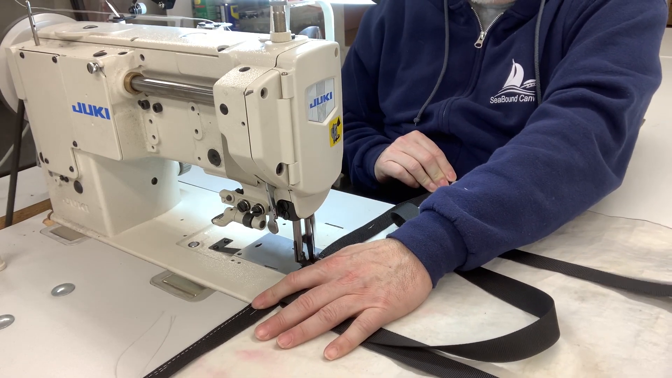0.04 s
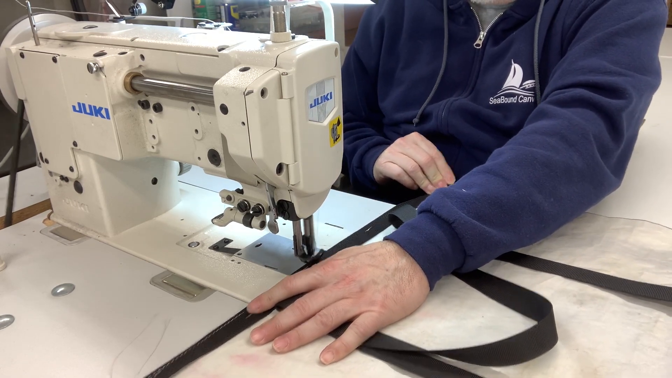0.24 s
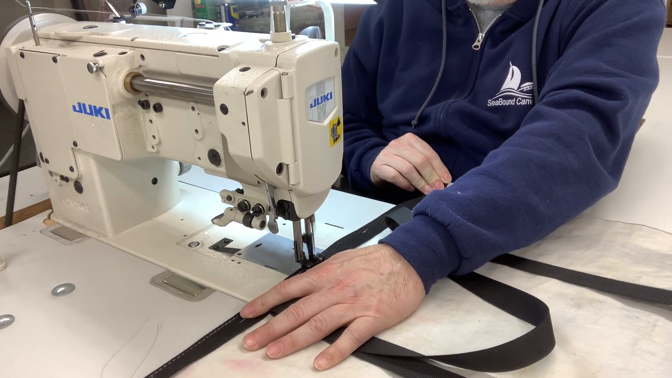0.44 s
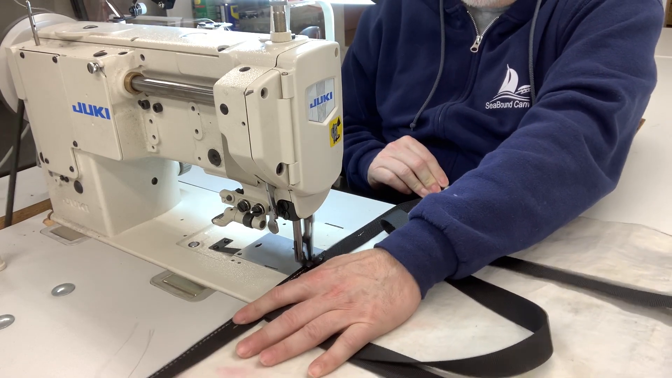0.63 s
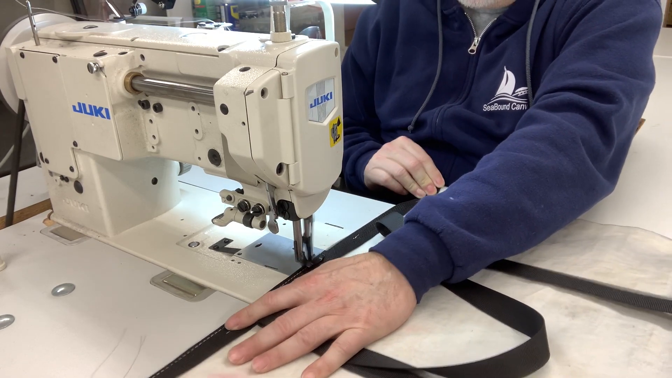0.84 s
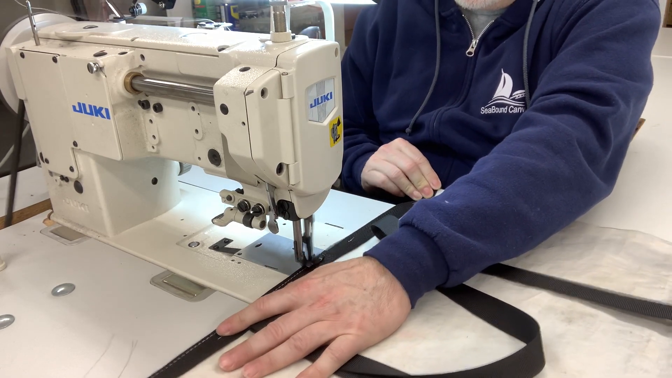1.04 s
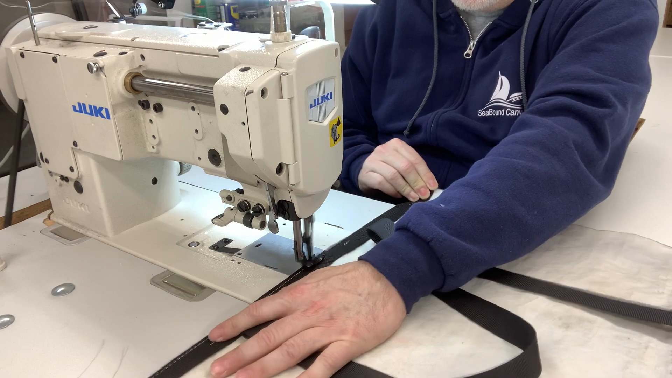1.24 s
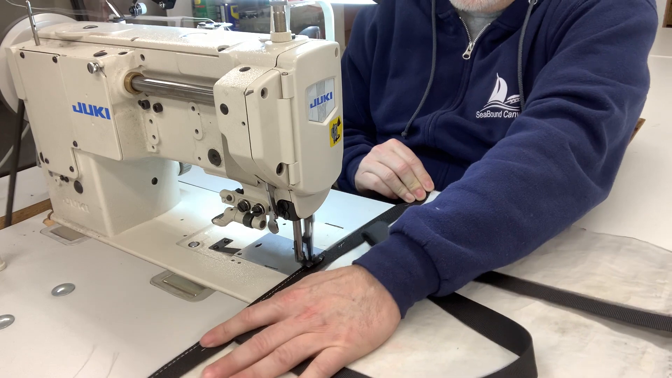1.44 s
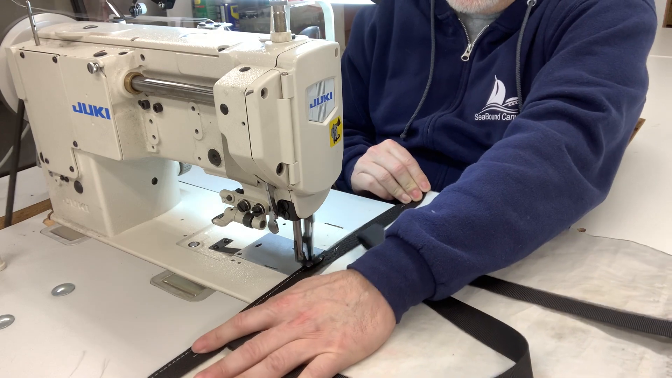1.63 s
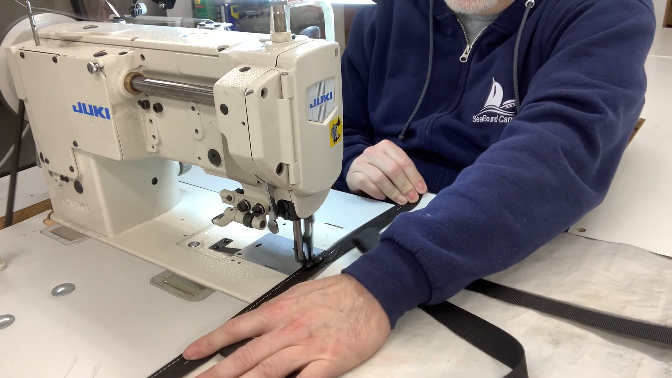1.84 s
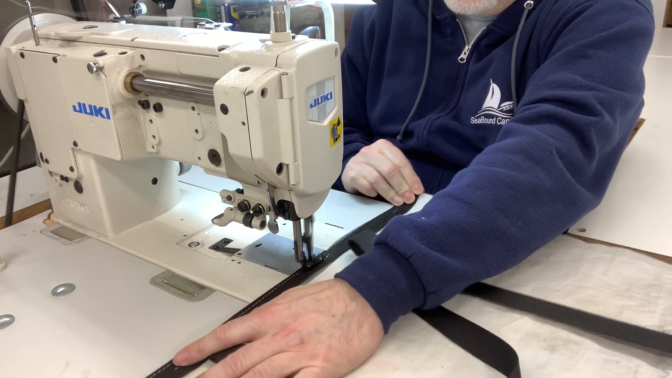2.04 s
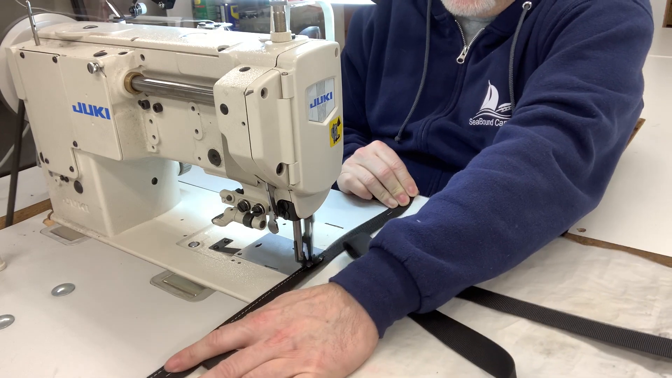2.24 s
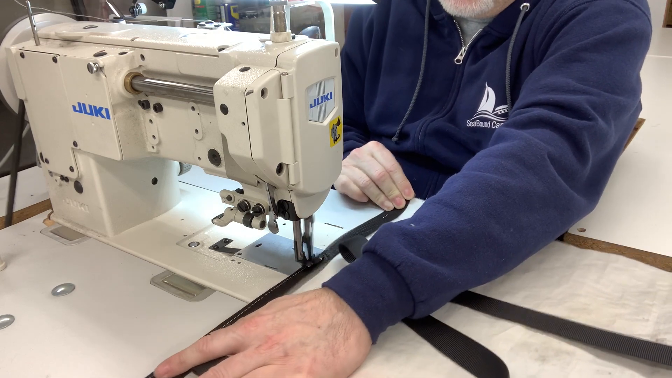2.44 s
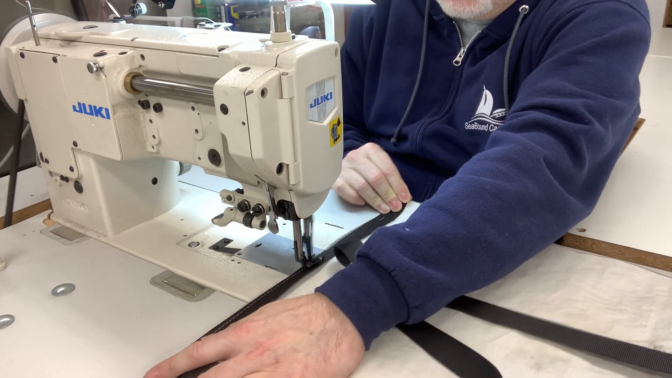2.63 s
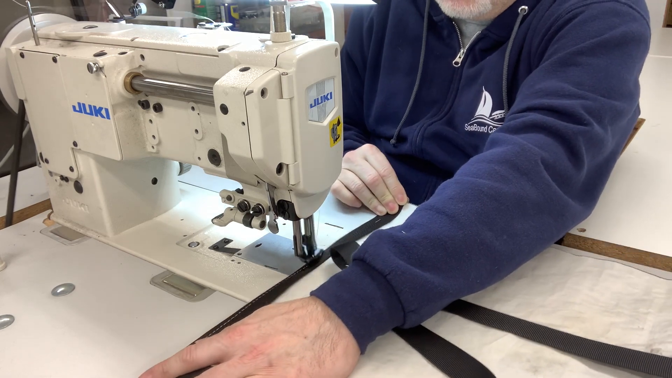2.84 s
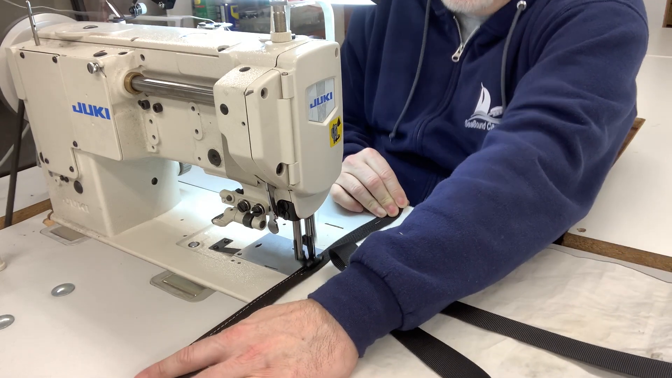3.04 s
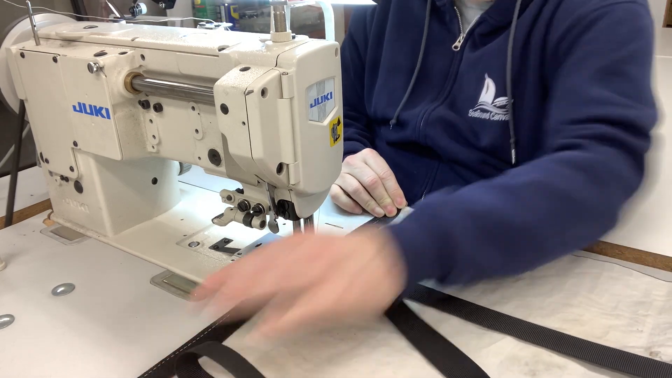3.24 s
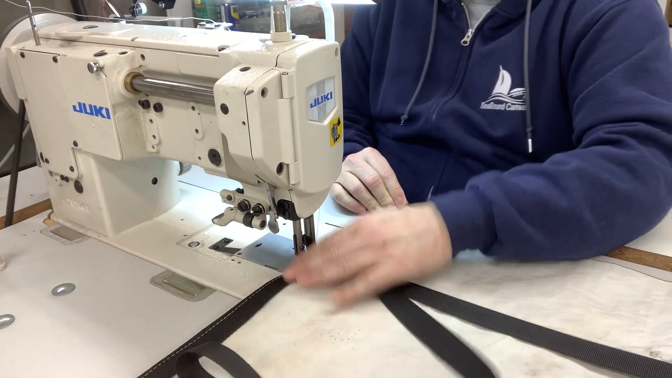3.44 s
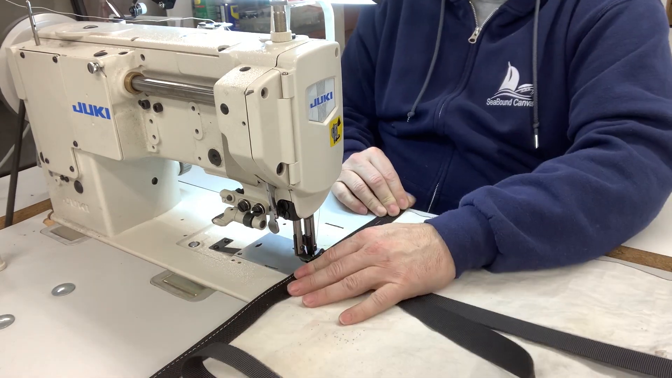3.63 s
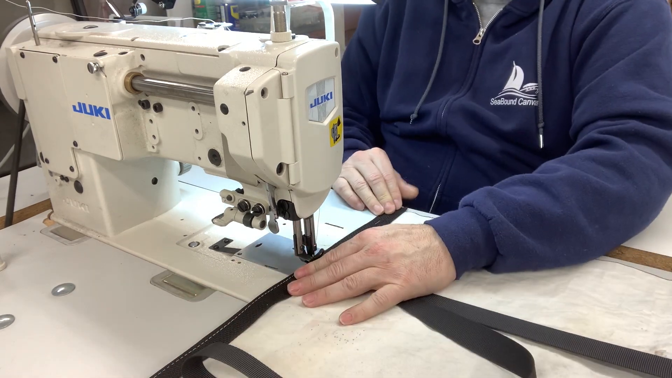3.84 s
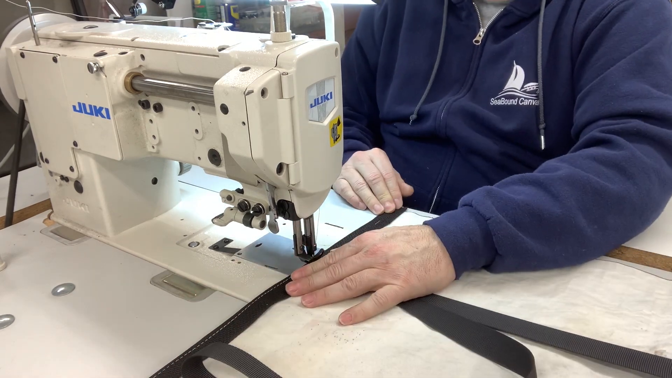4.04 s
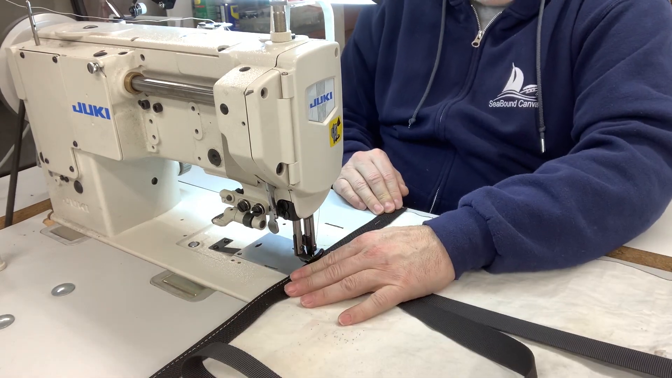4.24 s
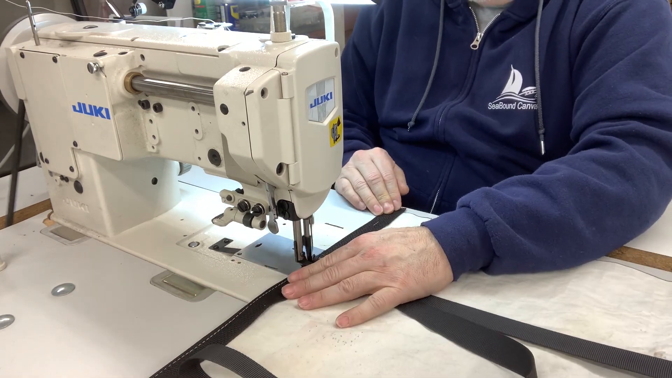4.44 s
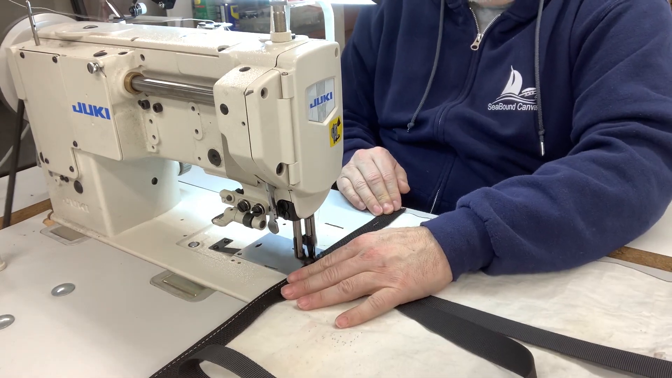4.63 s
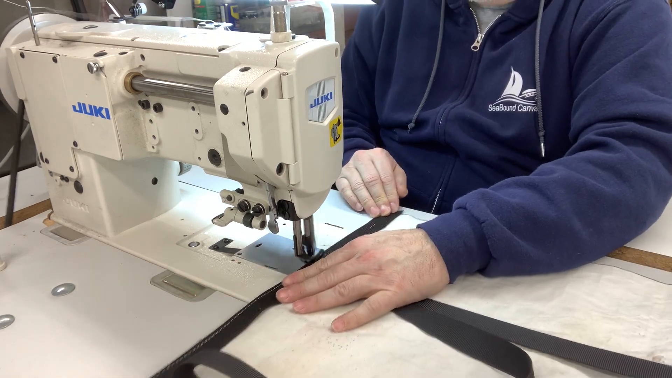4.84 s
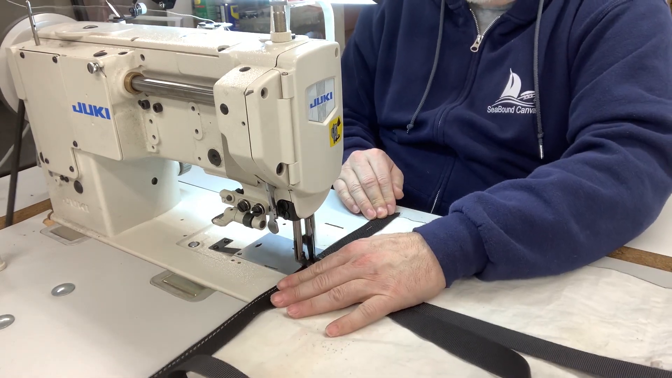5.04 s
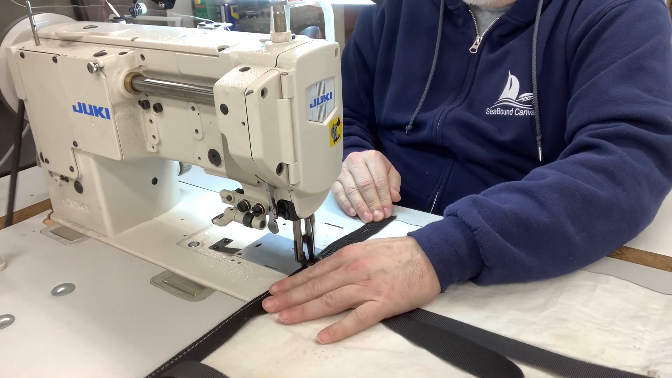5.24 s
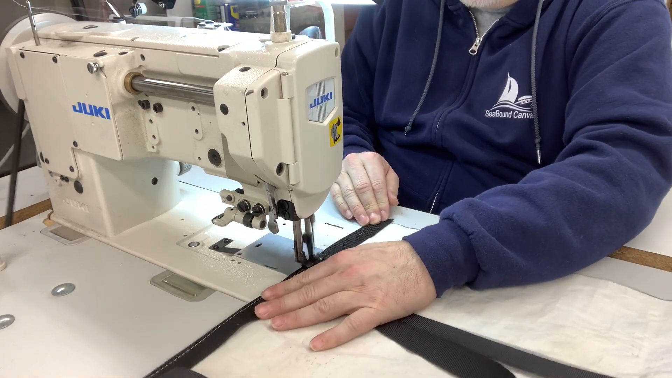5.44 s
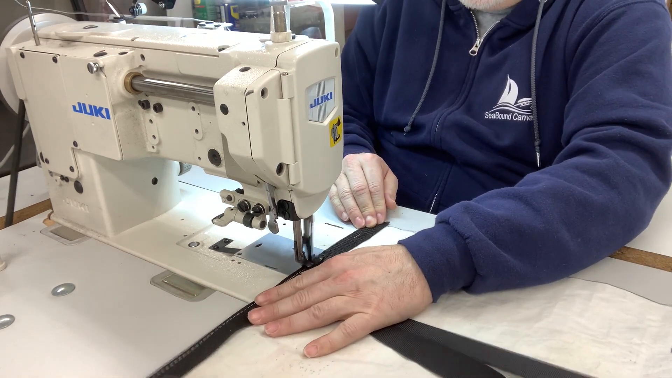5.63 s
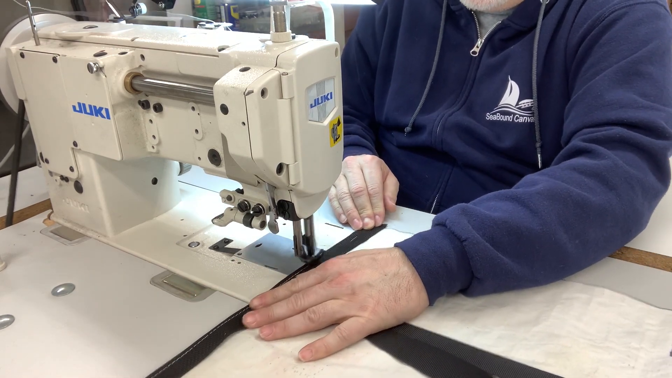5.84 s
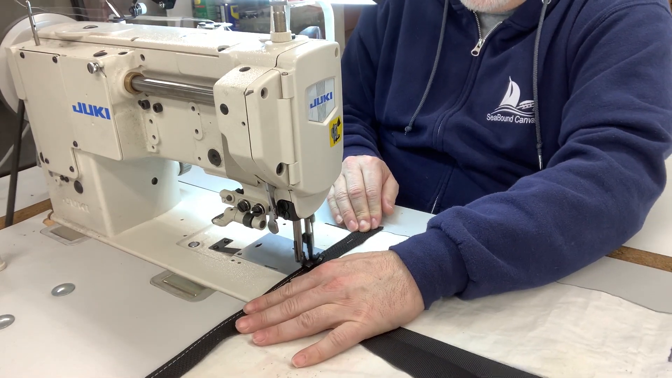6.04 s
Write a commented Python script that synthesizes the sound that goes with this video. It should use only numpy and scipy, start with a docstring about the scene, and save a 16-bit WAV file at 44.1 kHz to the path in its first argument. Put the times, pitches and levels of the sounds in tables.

```python
"""A walking-foot industrial sewing machine stitches webbing onto canvas in a small workshop, in two runs.
Shaft angle times every stitch: two presser feet land in turn as noise bursts, the linkage ticks, the table booms.
Contacts excite resonances of the iron head; gears rattle as tooth impulses and noise that follow shaft speed.
Between the runs the mechanism clunks to rest, a hand slides over the cloth as shaped noise,
and the servo whines, a wavering tone, as it creeps into the second run. Faint ventilation lies behind."""
import sys
import numpy as np
from scipy import signal
from scipy.fft import rfft, irfft
from scipy.io import wavfile

SR = 44100
rng = np.random.default_rng(int(sys.argv[2]) if len(sys.argv) > 2 else 0)


def pcm_store(signal):
    """Save signal as 16-bit PCM."""
    levels = np.round(np.clip(np.atleast_2d(signal), -1, 1) * 32767)
    wavfile.write(sys.argv[1], SR, levels.astype(np.int16).T)


N = 269010
TIME = np.arange(N) / SR
# Levels in the tables are relative: the functions add offsets. All *_COLOUR tables: hz, level_db


def undb(db):
    """Decibels to gain."""
    return 10 ** (np.asarray(db) / 20)


def curve(rows, axis=1):
    """One column of a table, joined by straight lines in time."""
    rows = np.array(rows)
    return np.interp(TIME, rows[:, 0], rows[:, axis])


def fade(t60_s):
    """Exponential decay, cut at half a second."""
    return np.exp(-np.log(1000) * TIME[:SR // 2] / max(t60_s, 1 / SR))


def add(track, at_s, sound):
    """Mix a sound into a track at a given time."""
    start = int(np.clip(at_s * SR, 0, N))
    track[start:start + len(sound)] += sound[:N - start]


def colour(x, points, size=4096):
    """Minimum-phase filter through (hz, level_db) points, unit power gain for white noise."""
    hz, db = np.transpose(points)
    bin_hz = np.fft.rfftfreq(size, 1 / SR)
    gain = undb(np.interp(np.log(bin_hz + 1), np.log(hz), db))
    cepstrum = irfft(np.log(gain))[:size // 2]
    cepstrum[1:] *= 2  # fold to a causal response
    response = irfft(np.exp(rfft(cepstrum, size)))
    return signal.oaconvolve(x, response / np.linalg.norm(response))[:N]


def noise(points):
    """Coloured noise of rms 1."""
    return colour(rng.standard_normal(N), points)


def walk(rate_hz):
    """Random wander: straight lines between normal draws, rate_hz draws per second."""
    return np.interp(TIME * rate_hz, np.arange(N), rng.standard_normal(N))


def uneven(at_s, spread_db):
    """A random dB offset for each stitch."""
    return spread_db * rng.standard_normal(len(at_s))


def blows(times_s, levels_db, t60_s, tail_db, tail_t60_s, alike, rise_t60_s):
    """Metal contacts: short chatter and longer tail of noise, partly the same at every blow."""
    track, same = np.zeros(N), rng.standard_normal(SR // 2)
    decay = fade(t60_s) + undb(tail_db) * fade(tail_t60_s)
    shape = decay * (1 - fade(rise_t60_s))
    for at, db in zip(times_s, levels_db):
        chatter = np.sqrt(alike) * same + np.sqrt(1 - alike) * rng.standard_normal(SR // 2)
        add(track, at, undb(db) * shape * chatter)
    return track


def ring(modes, times_s, levels_db):
    """Decaying modes; neighbours start in opposite directions, so they beat against each other."""
    tone = np.zeros(SR // 2)
    for k, (hz, db, t60_s) in enumerate(modes):
        tone += (-1) ** k * undb(db) * fade(t60_s) * np.sin(2 * np.pi * hz * TIME[:SR // 2])
    track = np.zeros(N)
    for at, db in zip(times_s, levels_db):
        add(track, at, undb(db) * tone)
    return track


# shaft, one turn a stitch: time_s, turns_per_s
SHAFT_SPEED = [(0, 6.176), (.8, 10.038), (.92, 10.228), (1.1, 10.028), (2.46, 9.977), (2.75, 9.218),
               (2.85, 4.315), (3.03, 0), (4.31, 0), (4.35, 1.6), (4.6, .2), (4.74, 6.352), (4.95, 8.73),
               (5.25, 9.858), (5.4, 9.383), (6.1, 7.147)]
FULL_TURNS_PER_S = 10


def speed_at(times_s):
    """Shaft speed in turns per second."""
    return np.interp(times_s, *np.transpose(SHAFT_SPEED))


def force_db(at_s, slope_db):
    """Level against speed: slope in dB per doubling, zero at full speed, floor at 0.6 of full speed."""
    return slope_db * np.log2(np.clip(speed_at(at_s) / FULL_TURNS_PER_S, .6, None))


# runs of stitches: start_s, first_outer_landing_s, end_s
RUNS = [(0, .0666, 2.93), (4.74, 4.8178, 6.1)]


def passes(share):
    """Times at which the shaft passes a given share of its turn, in all runs."""
    turns, times = np.cumsum(curve(SHAFT_SPEED)) / SR, []
    for start, first, end in RUNS:
        low, zero, high = np.interp([start, first, end], TIME, turns)
        marks = zero + share + np.arange(-1, high - zero)
        inside = marks[(marks > low) & (marks < high)]
        times.extend(np.interp(inside, turns, TIME))
    return np.array(times)


def shaft_turns():
    """Shaft angle in turns; whole numbers are landings of the outer foot."""
    turns = np.cumsum(curve(SHAFT_SPEED)) / SR
    first_landing = np.where(TIME < RUNS[1][0], RUNS[0][1], RUNS[1][1])
    return turns - np.interp(first_landing, TIME, turns)


# table and stand: hz, level_db, t60_s
TABLE_MODES = [(174.9, -1, .24), (200.3, 0.34, 0.26), (248.6, -9.5, 0.46), (275, -9, 0.088),
               (322.6, -30.5, .4), (409, -18.5, 0.39), (462.2, -20, 0.32), (496, -14.5, 0.094)]
# steel on steel; slap on the bed plate
SNAP_COLOUR = [(300, -37), (1300, 7.5), (2200, -5), (5000, -4.5), (6200, 4.5), (9800, 3.5), (11500, -1),
               (13500, 3), (15000, -4), (16000, -14)]
CLACK_COLOUR = [(140, 11), (260, 4), (420, 8), (800, -24.5), (1300, -1.5), (2000, 4), (3500, -1),
                (4300, -1.5), (5000, 2), (6200, -11), (9800, -7), (11500, -7), (13500, -1), (16000, -51)]
OUTER_DB = -14


def outer_foot():
    """Steel snaps on steel and slaps the bed plate; then the feed pulls and shakes the table."""
    at = passes(0)
    db = OUTER_DB + force_db(at, slope_db=1.5) + uneven(at, spread_db=1.36)
    snap = blows(at + .0007, db - 8.5, t60_s=.0085, tail_db=-19.5, tail_t60_s=.076,
                 alike=.6, rise_t60_s=.0027)
    slap = blows(at + .0016, db - 14.5, t60_s=.014, tail_db=-10.5, tail_t60_s=.11,
                 alike=.6, rise_t60_s=.0031)
    boom_db = force_db(at, slope_db=8) - 23.2 + uneven(at, spread_db=.55)
    boom = ring(TABLE_MODES, at + .00989, boom_db)
    return colour(snap, SNAP_COLOUR) + colour(slap, CLACK_COLOUR), boom + bed_plate(at)


BED_START_HZ, BED_END_HZ, BED_SAG_S, BED_DB = 780.6, 419.4, .01192, -29
THUMP_HZ, THUMP_DB = 337, -27.5
BED_PITCH_SPREAD, BED_SPREAD_DB = .05, 2


def bed_plate(times_s):
    """Plate under the outer foot: a thump and a flexing tone that sags; the cloth varies each slap."""
    track, age = np.zeros(N), TIME[:SR // 2]
    for at, (size, stiff, weight) in zip(times_s, rng.standard_normal((len(times_s), 3))):
        hz = BED_END_HZ + (BED_START_HZ - BED_END_HZ) * np.exp(-age / BED_SAG_S)
        hz = hz * (1 + BED_PITCH_SPREAD * stiff)
        flex = fade(.085) * (1 - fade(.024)) * np.sin(2 * np.pi * np.cumsum(hz) / SR)
        flex *= undb(BED_DB + BED_SPREAD_DB * size)
        thump = fade(.02) * np.sin(2 * np.pi * THUMP_HZ * age)
        thump *= undb(THUMP_DB + BED_SPREAD_DB * weight)
        add(track, at + .002, undb(force_db(at, slope_db=10)) * (flex + thump))
    return track


# landing force as layers of webbing pass under: time_s, level_db
INNER_FORCE = [(0, -19.5), (.16, -20), (.29, -19.5), (.42, -22.5), (.65, -26.5), (.95, -20), (2.3, -22.5),
               (2.55, -23.5), (4.76, -22), (4.9, -18), (5.02, -24.5), (5.75, -25.5), (6.1, -29)]
KNOCK_COLOUR = [(130, -30), (400, -3), (740, 3), (1100, -16.5), (2100, 2.5), (2900, -3), (3750, 2.5),
                (4600, -10.5), (6000, -8), (10000, -20), (16000, -23)]
# bar of the foot: hz, level_db, t60_s
INNER_BAR_MODES = [(738, 4.5, 0.054), (2092, 2.5, 0.066), (2740, -4, 0.027), (3685, 0.5, 0.029),
                   (5030, -4, 0.046)]
# guide of the bar: hz, level_db, t60_s
GUIDE_MODES = [(3520, 2, 0.012), (4080, 1.5, 0.011), (4500, -6, 0.013), (5100, -6, 0.014)]
INNER_TURN = .597  # share of a turn after the outer foot
REBOUND_MIN_S, REBOUND_MAX_S = .001, .003


def inner_foot():
    """A knock through webbing rings the foot's bar, which clacks and rebounds in its guide at speed."""
    at = passes(INNER_TURN)
    db = np.interp(at, *np.transpose(INNER_FORCE)) + uneven(at, spread_db=1)
    knock = blows(at + .00078, db - 11, t60_s=.027, tail_db=-15.5, tail_t60_s=.032,
                  alike=.49, rise_t60_s=.0009)
    bar = ring(INNER_BAR_MODES, at + .001605, db - 18.5)
    clack_db = db + np.minimum(force_db(at, slope_db=26), 0) - 6.5
    rebound_s = rng.uniform(REBOUND_MIN_S, REBOUND_MAX_S, len(at))
    clack = ring(GUIDE_MODES, at + .000838, clack_db)
    rebound = ring(GUIDE_MODES, at + .0008 + rebound_s, clack_db - 11 + uneven(at, spread_db=1.5))
    boom = ring(TABLE_MODES, at + .00691, force_db(at, slope_db=-1) - 34)
    return colour(knock, KNOCK_COLOUR), boom + bar + clack + rebound


# contacts within the stitch: turn_share_after_outer_foot, bright_tick_db, dull_knock_db, t60_s
LINKS = [(.178, -37.5, -40, 0.025), (.3, -54, -38, 0.011), (.352, -60, -39.5, 0.024),
         (.487, -40, -40, 0.008), (.684, -35, -36, 0.021), (.78, -42.5, -47.5, 0.011),
         (.84, -58, -39.5, 0.014), (0.979, -53, -37, 0.016)]
TICK_COLOUR = [(300, 12.5), (1500, 4), (3200, 7.5), (5000, 8.5), (7500, 9), (11000, 5), (16000, -2.5)]
LINK_COLOUR = [(130, -32), (300, 6.5), (450, -4), (700, -8), (950, -0.5), (1250, -5.5), (1550, -2.5),
               (2700, -7), (4000, -16.5), (16000, -26)]


def linkage():
    """Feed, levers, needle bar and hook each take up their play at their own point of the turn."""
    ticks, knocks = np.zeros((2, N))
    for share, tick_db, knock_db, t60_s in LINKS:
        at = passes(share)
        db = force_db(at, slope_db=4.5) + uneven(at, spread_db=3)
        ticks += blows(at, db + tick_db, t60_s, tail_db=-21, tail_t60_s=.2,
                       alike=.53, rise_t60_s=.0021)
        knocks += blows(at, db + knock_db, t60_s, tail_db=-16, tail_t60_s=.13,
                        alike=.59, rise_t60_s=.0044)
    return colour(ticks, TICK_COLOUR) + colour(knocks, LINK_COLOUR)


# hook and bobbin case: hz, level_db, t60_s
HOOK_MODES = [(2950, 3.5, 0.055), (7720, -4, 0.036), (7950, -5.5, 0.044), (9060, -19, 0.014),
              (10900, 3.5, .018)]
HOOK_TURN, HOOK_DB = .688, -41.5


def hook():
    """Just after the inner foot the hook and its case chink brightly."""
    at = passes(HOOK_TURN)
    return ring(HOOK_MODES, at, HOOK_DB + force_db(at, slope_db=14) + uneven(at, spread_db=4.5))


# iron head and its steel parts: hz, level_db, t60_s
HEAD_MODES = [(600, 7.5, 0.54), (710, -3.5, 0.044), (931, 1, 0.088), (1078, -4.5, 0.084), (1192, -3, 0.025),
              (1513, -2, 0.024), (1682, -4, 0.016), (2130, -0.5, 0.027), (2450, -9, 0.006),
              (2760, -1.5, 0.009), (3300, -1, 0.041), (3520, -4, 0.017), (3840, -4, 0.01),
              (4950, -5.5, 0.028), (7040, -1.5, 0.033), (8150, -8, 0.025), (10200, -6, 0.007)]


def head(force):
    """The casting passes each contact on and rings at its own modes, as two-pole resonators."""
    out = force.copy()
    for hz, db, t60_s in HEAD_MODES:
        r = np.exp(-np.log(1000) / (t60_s * SR))
        poles = [1, -2 * r * np.cos(2 * np.pi * hz / SR), r * r]
        out += undb(db) * signal.lfilter([1 - r, 0, r - 1], poles, force)
    return out


POWER_OFF_S, POWER_ON_S, POWER_FALL_DB_PER_S = 3.28, 4.31, 148
GEAR_CRAWL_DB, GEAR_DB_PER_TURN_PER_S = -51, 1.7565


def gear_db():
    """The gear grows louder with speed and dies away while the servo is off."""
    off_s = (TIME < POWER_ON_S) * np.maximum(TIME - POWER_OFF_S, 0)
    return GEAR_CRAWL_DB + GEAR_DB_PER_TURN_PER_S * curve(SHAFT_SPEED) - POWER_FALL_DB_PER_S * off_s


def teeth(turns, count):
    """Tiny contacts of gears and bearings, the same in every turn; rms 1 at full speed."""
    tooth = np.floor(turns * count).astype(int) % count
    meets = np.diff(tooth, prepend=tooth[0]) != 0
    return meets * rng.standard_normal(count)[tooth] * np.sqrt(SR / (count * FULL_TURNS_PER_S))


GEAR_COLOUR = [(35, -48), (55, -4), (90, 4), (140, 6.5), (300, 7), (480, -0.5), (700, -1), (1100, -0.5),
               (1900, -7.5), (2800, 0), (4500, -9), (8000, -10.5), (13000, -15.5), (16000, -20)]
GRIND_COLOUR = [(300, -9), (550, -2), (750, 3), (1000, -5.5), (1400, -7), (2200, -23), (8000, -33)]
# servo effort against the load; the first value also holds before its time: time_s, effort_share
CREEP = [(4.3, 0.095), (4.31, 1), (4.35, 0.9), (4.66, 0.77), (4.8, 0)]
GEAR_EASE_DB_PER_TURN = 10  # at full speed
WHINE_HZ, WHINE_DB, WHINE_START_S = 9975, -68, 4.338


def gear():
    """Hook and gears rattle and ease after each landing; grind and the servo's switching tone track effort."""
    turns = shaft_turns()
    since_landing = np.minimum(turns % 1, (turns - INNER_TURN) % 1)
    load_db = -GEAR_EASE_DB_PER_TURN * since_landing * curve(SHAFT_SPEED) / FULL_TURNS_PER_S
    mesh = colour(teeth(turns, count=600), GEAR_COLOUR) + undb(-.5) * noise(GEAR_COLOUR)
    rattle = mesh * undb(gear_db() + load_db + 2.97 * walk(250) - 9.5)
    grind = noise(GRIND_COLOUR) * undb(-60 + 5.3 * walk(90))
    whine = np.sin(2 * np.pi * WHINE_HZ * TIME + 1.1 * walk(110))
    whine *= undb(WHINE_DB + 3 * walk(40)) * (TIME > WHINE_START_S)
    return rattle + curve(CREEP) * (grind + whine)


# flicks of the thread: start_s, level_db
THREAD_TICKS = [(.1378, -28), (.274, -24), (.5318, -33), (3.0529, -20.5), (3.268, -45), (4.6275, -30)]
THREAD_COLOUR = [(2000, -23), (4500, -8), (8000, -4), (13500, -2), (16000, -3)]
FLICK_TURN, FLICK_DB = .332, -23


def thread_ticks():
    """The thread flicks off the hook with a thin tick: every turn, louder at speed, and at listed times."""
    turn_at = passes(FLICK_TURN)
    at, db = np.transpose(THREAD_TICKS)
    at = np.append(at, turn_at)
    db = np.append(db, FLICK_DB + force_db(turn_at, slope_db=16))
    flicks = blows(at, db, t60_s=.0018, tail_db=-32, tail_t60_s=.03, alike=0, rise_t60_s=.0005)
    return colour(flicks, THREAD_COLOUR)


# taut thread in its guides: start_s, level_db, pitch_hz, t60_s
SQUEAKS = [(.022, -46.5, 2870, 0.079), (.321, -46, 2760, .038), (0.562, -46, 2750, 0.042),
           (4.86, -50, 1486, 0.08), (5.919, -45.5, 2880, 0.031)]


def thread():
    """Short rough squeaks as the thread sticks and slips."""
    track = np.zeros(N)
    for at, db, hz, t60_s in SQUEAKS:
        shape = fade(t60_s) * (1 - fade(.048)) ** 2
        tone = np.sin(2 * np.pi * hz * TIME + 1.2 * walk(787))[:SR // 2]
        add(track, at, undb(db + 12.5) * tone * shape / shape.max())
    return track


# pedal, brake and levers: start_s, level_db, click_t60_s, thud_db, crack_db, lifter_db, latch_db
CLUNKS = [(2.9304, -38, 0.38, 7, 5, -22, -25), (2.9516, -37, .054, -8, 6.5, -26, -25),
          (3.034, -20.5, .14, -1, -4.5, -15, -20), (3.0974, -36, .04, -11, 3, -25, -16),
          (3.126, -31.5, 0.12, -1, -8, -22, -16), (3.149, -34, .05, -9, -18, -23, -11),
          (3.162, -26, 0.19, -12, -2.5, -27, -21), (3.1947, -31, 0.11, 0.5, -6, -19, -14),
          (3.2455, -43, .06, -2, -20, -8, -22), (3.318, -41.5, .06, -18, -21, -27, -3.5),
          (3.3502, -39.5, 0.095, -5, -27, -18, -16), (3.5537, -32, 0.098, -19, -2.5, -28, -24),
          (3.745, -38.5, 0.28, -3.5, -19, -23, -21), (4.4407, -30.5, 0.061, -13, -2, -24, -23),
          (4.453, -44, 0.03, -15, 7, -29, -25), (4.475, -43, .021, -21, 8, -28, -20),
          (4.554, -37, 0.024, -17, 1, -30, -29), (4.612, -32, .04, -6, 0, -21, -28),
          (4.675, -34, .052, -19, -4, -16, -25), (4.713, -42, .025, -12, -1, -25, -26)]
CLUNK_COLOUR = [(100, 4.5), (500, -3), (1100, -1.5), (1700, 0), (2900, -0.5), (3700, -8.5), (5700, -21),
                (8000, -32), (16000, -36)]
CRACK_COLOUR = [(1500, -16), (4000, 1), (5700, 4.5), (8500, -3), (11000, -8), (16000, -13)]
THUD_COLOUR = [(40, 18), (90, -13), (280, 10), (520, -1.5), (800, 3.5), (1150, -8), (1700, -7), (5000, -25)]
# foot-lifter linkage: hz, level_db, t60_s
LIFTER_MODES = [(247.5, -2, 0.45), (314, -9, 0.18), (491, -6.5, 0.34), (581, -2.5, 0.21), (1000, -9, 0.2),
                (1160, 5, 0.088), (1820, -11, .14), (2390, 4, 0.072), (2650, 5.5, 0.045), (2870, -8, .075),
                (3770, -10, 0.15)]
# latch that the levers strike: hz, level_db, t60_s
LATCH_MODES = [(1760, 0, 0.066), (2607, -1, 0.081), (2880, 0, 0.1), (3170, 2, .05), (4300, -12, 0.046)]


def clunks():
    """Levers hit stops: click, table thud and bare-steel crack; the lifter linkage and latch ring on."""
    clicks, cracks, thuds = np.zeros((3, N))
    for at, db, t60_s, thud_db, crack_db, _, _ in CLUNKS:
        click, crack, thud = rng.standard_normal((3, SR // 2))
        strike = undb(db - 15.5) * (fade(t60_s) + fade(.0087))
        add(clicks, at + .00056, strike * click)
        add(cracks, at + .00062, strike * undb(crack_db - 3) * crack)
        add(thuds, at + .00219, undb(db + thud_db - 13.5) * fade(.45) * thud)
    at, db, _, thud_db, _, lifter_db, latch_db = np.transpose(CLUNKS)
    body = ring(TABLE_MODES, at, db + thud_db - 18.5)
    body += ring(LIFTER_MODES, at + .00122, db + lifter_db)
    body += ring(LATCH_MODES, at + .001004, db + latch_db)
    contacts = colour(clicks, CLUNK_COLOUR) + colour(cracks, CRACK_COLOUR)
    return contacts, body + colour(thuds, THUD_COLOUR)


# start_s, level_db
JOLTS = [(4.334, -41), (4.388, -46), (4.632, -42.5), (4.699, -42)]


def jolts():
    """The shaft takes up the load and rocks the table, which rings at its modes."""
    return ring(TABLE_MODES, *np.transpose(JOLTS))


# two as the drive takes up, one with the second run's first outer-foot landing: start_s, level_db
CLANKS = [(4.3092, -39.5), (4.6062, -37), (4.8194, -28.5)]
# shaft and coupling: hz, level_db, t60_s
SHAFT_MODES = [(1470, 0.5, .02), (1870, -3, .03), (2160, 0.5, 0.038), (2480, 5, 0.019), (2760, 0, 0.045),
               (3600, -1, 0.018), (5050, -15, 0.023)]


def clanks():
    """Hard steel clanks: a noisy contact with the ringing modes of shaft and coupling."""
    at, db = np.transpose(CLANKS)
    contact = blows(at, db - 5, t60_s=.011, tail_db=-8, tail_t60_s=.091, alike=.8, rise_t60_s=.001)
    return ring(SHAFT_MODES, at, db) + colour(contact, TICK_COLOUR)


# belt under braking or load: start_s, length_s, pitch_hz, level_db
GROANS = [(2.959, 0.29, 92.4, -42.5), (4.292, 0.084, 67.3, -49), (4.615, 0.12, 74.5, -47.5)]
GROAN_SAG_HZ_PER_S = 30


def belt():
    """Low, uneven groans that swell, sag in pitch and fade."""
    track = np.zeros(N)
    for at, length_s, hz, db in GROANS:
        age = np.clip(TIME - at, 0, length_s)
        pitch_hz = (hz - GROAN_SAG_HZ_PER_S * (age - length_s / 2)) * (1 + .057 * walk(40))
        swell = np.sin(np.pi * age / length_s) ** 2
        tone = np.sin(2 * np.pi * np.cumsum(pitch_hz) / SR)
        track += undb(db + 2 * walk(25.5)) * swell * tone
    return track


# stand: hz, level_db, t60_s
STAND_MODES = [(93.6, -0.5, 0.13)]


def stand():
    """Slow stitches give the stand time to sway; at full speed it moves less."""
    at = passes(0)
    db = force_db(at, slope_db=-13.5) - 51 + uneven(at, spread_db=5.5)
    return ring(STAND_MODES, at + .0203, db)


RUMBLE_COLOUR = [(110, -55), (152, -22), (176, 0), (205, 0), (230, -14), (252, -3), (290, -22), (600, -55)]


def rumble():
    """The table hums between the blows: low noise at a level that follows the gear."""
    return noise(RUMBLE_COLOUR) * undb(gear_db() - 10)


# hand and sleeve on canvas: start_s, attack_s, hold_s, release_t60_s, level_db
STROKES = [(3.367, 0.1, 0.12, 0.46, -52), (3.469, 0.0081, 0.0099, 0.2, -43),
           (3.62, 0.17, 0.25, 0.39, -63.5)]
CLOTH_COLOUR = [(35, -43), (60, -23), (139, -10), (217, -12), (250, -6), (803, -17.5), (924, -11.5),
                (1140, -22.5), (1820, -10.5), (16000, -29)]


def cloth():
    """Skin and sleeve catch and slip on the weave; each stroke swells, holds and dies away."""
    pressure = np.zeros(N)
    for at, attack_s, hold_s, release_t60_s, db in STROKES:
        after = np.maximum(TIME - at - attack_s - hold_s, 0)
        swell = np.clip((TIME - at) / attack_s, 0, 1)
        pressure += undb(db) * swell * np.exp(-np.log(1000) * after / release_t60_s)
    return noise(CLOTH_COLOUR) * pressure * undb(2.9 * walk(300))


def workshop(x, wet_db, t60_s):
    """A cluttered room: a short diffuse noise tail, strongest in the low bass."""
    tail = fade(t60_s) * (1 - fade(.076)) * rng.standard_normal(SR // 2)
    wet = signal.oaconvolve(x, tail / np.linalg.norm(tail))[:N]
    room_colour = [(80, 5.5), (140, -9.5), (250, -7.5), (600, 1), (3000, -5.5), (8000, -2), (16000, -1.5)]
    return x + undb(wet_db) * colour(wet, room_colour)


# ventilation: hz, level_db
AIR_COLOUR = [(15, -48), (25, -30), (92, 6), (161, 4), (256, -2), (451, -5), (775, -29), (1130, -12),
              (4870, -18.5), (6380, -14), (9070, -22), (14800, -18), (16000, -36)]
AIR_DB = -62.5


def ventilation():
    """Faint air noise with a slowly wandering level."""
    return noise(AIR_COLOUR) * undb(AIR_DB + walk(6.5))


def scene():
    """The machine and the hand in the room, over faint ventilation."""
    outer_contacts, outer_boom = outer_foot()
    inner_contacts, inner_boom = inner_foot()
    clunk_contacts, clunk_boom = clunks()
    contacts = outer_contacts + inner_contacts + clunk_contacts
    booms = outer_boom + inner_boom + clunk_boom + jolts()
    # the booms carry little below the table's first modes
    booms = signal.sosfilt(signal.butter(3, 135, "high", fs=SR, output="sos"), booms)
    machine = undb(1.5) * head(contacts + linkage() + gear()) + booms
    machine += hook() + thread_ticks() + thread() + clanks() + belt() + stand() + rumble()
    return (workshop(machine + cloth(), wet_db=-10, t60_s=.36) + ventilation())[None]


def record(dry):
    """A small microphone: no deep bass, and a steep cut at the top."""
    thin = signal.sosfilt(signal.butter(6, 44, "high", fs=SR, output="sos"), dry)
    return signal.sosfilt(signal.ellip(10, .2, 80, 16000, fs=SR, output="sos"), thin)


dry = scene()
out = record(dry)
pcm_store(out)
```